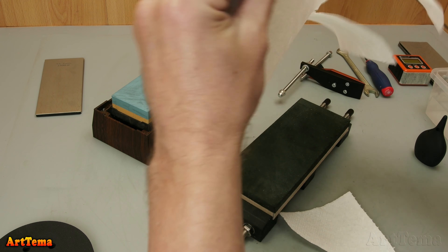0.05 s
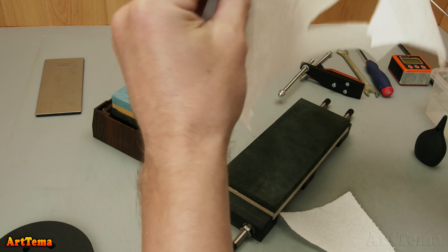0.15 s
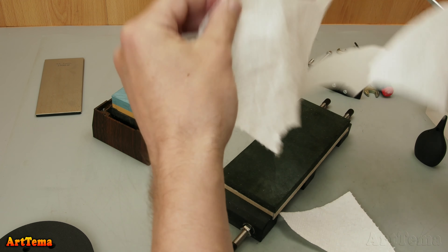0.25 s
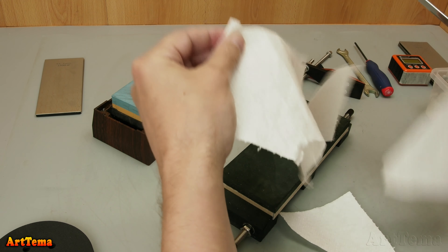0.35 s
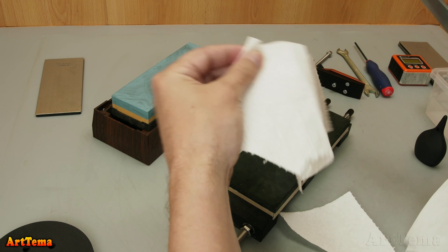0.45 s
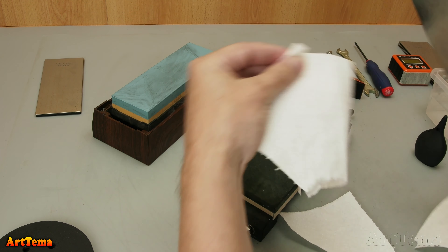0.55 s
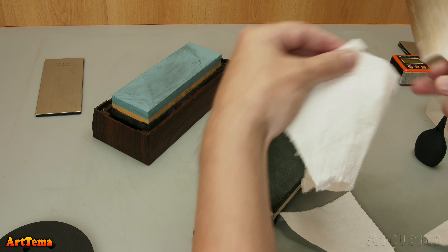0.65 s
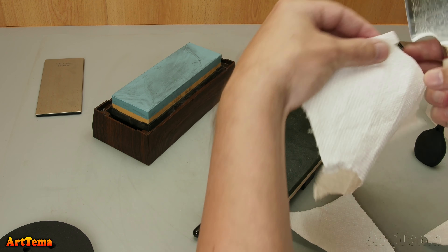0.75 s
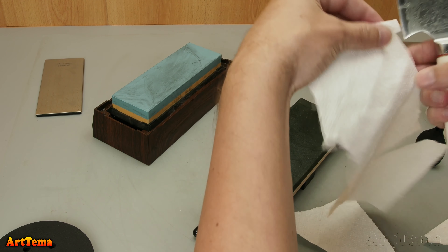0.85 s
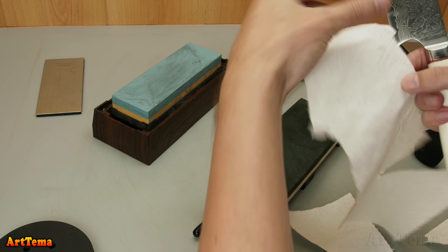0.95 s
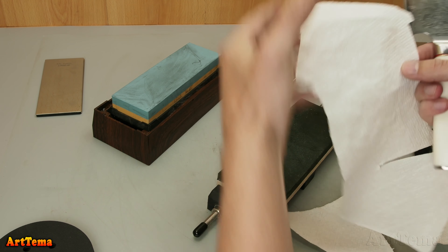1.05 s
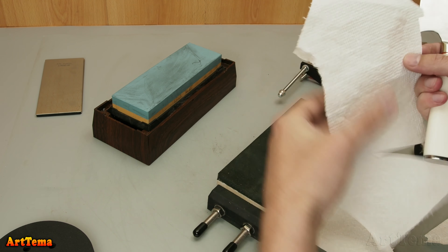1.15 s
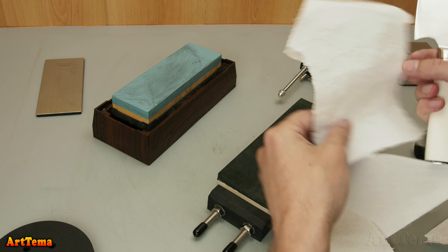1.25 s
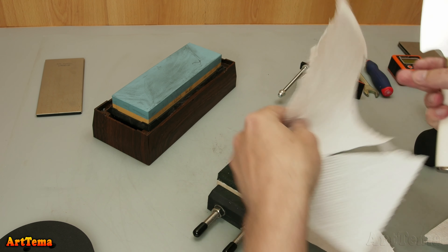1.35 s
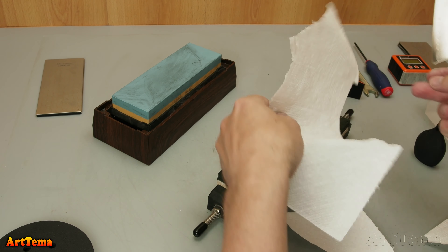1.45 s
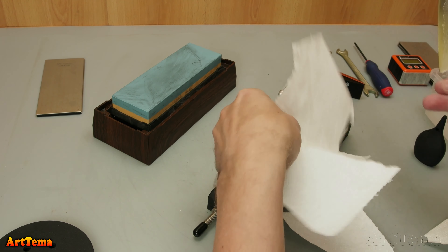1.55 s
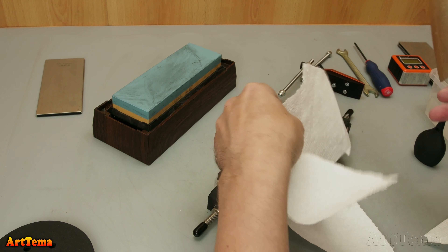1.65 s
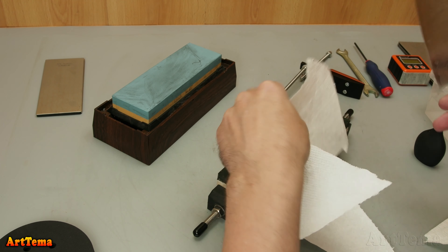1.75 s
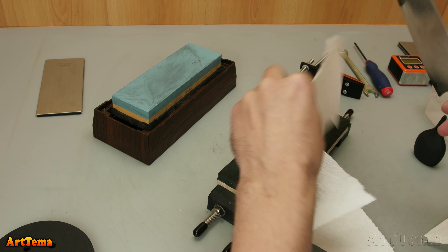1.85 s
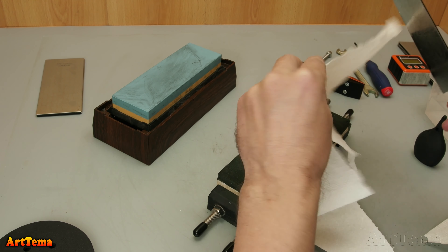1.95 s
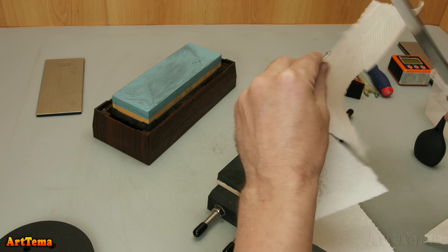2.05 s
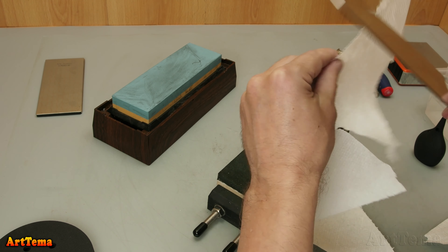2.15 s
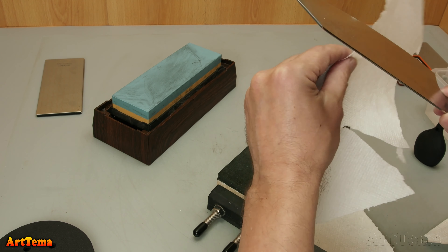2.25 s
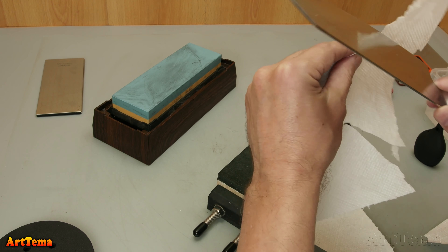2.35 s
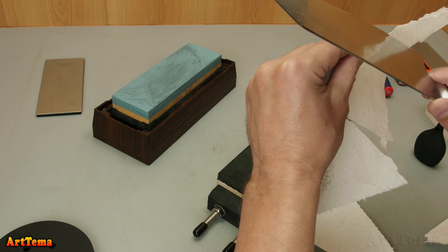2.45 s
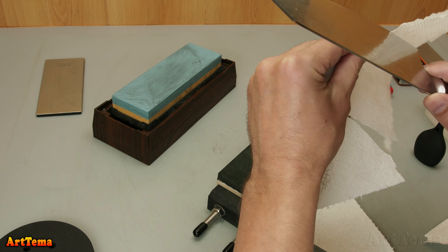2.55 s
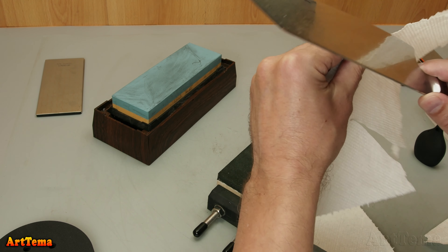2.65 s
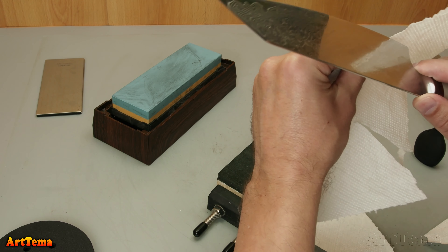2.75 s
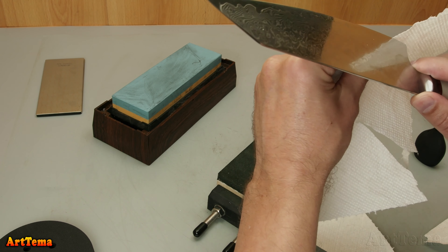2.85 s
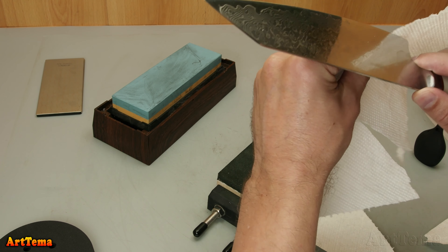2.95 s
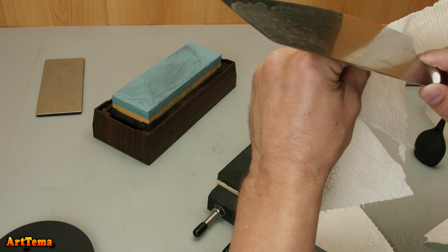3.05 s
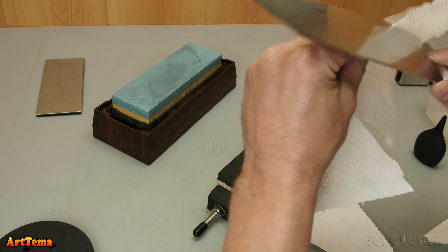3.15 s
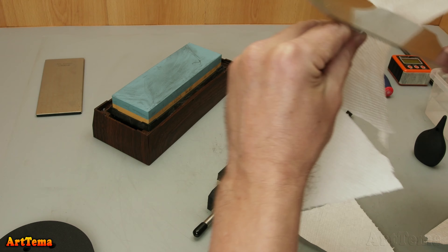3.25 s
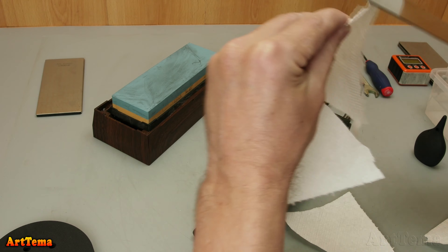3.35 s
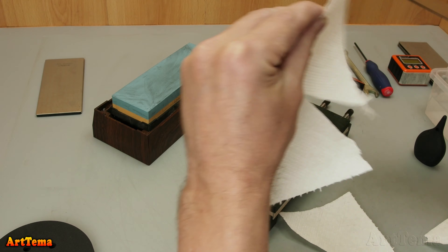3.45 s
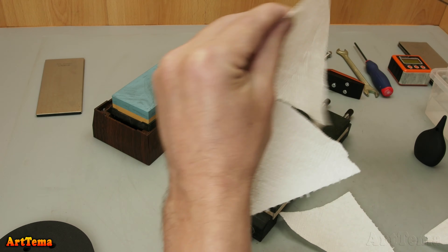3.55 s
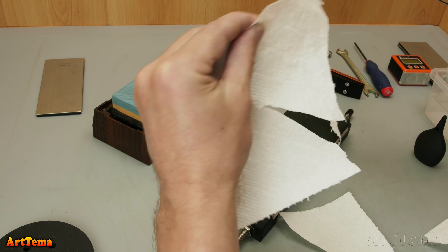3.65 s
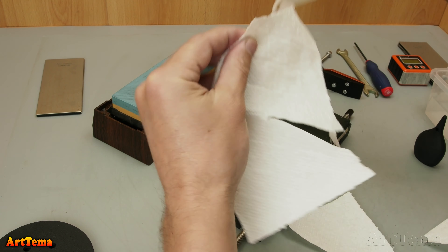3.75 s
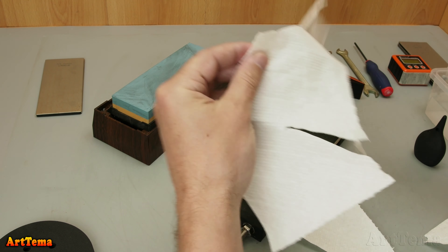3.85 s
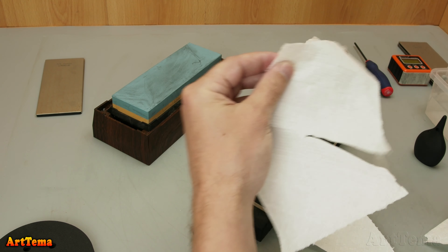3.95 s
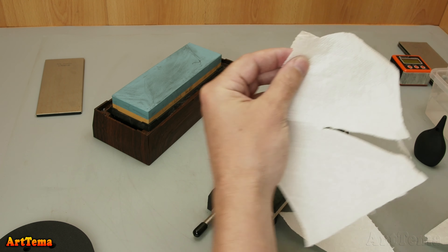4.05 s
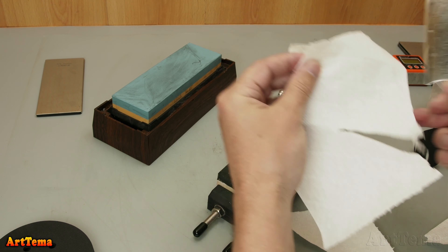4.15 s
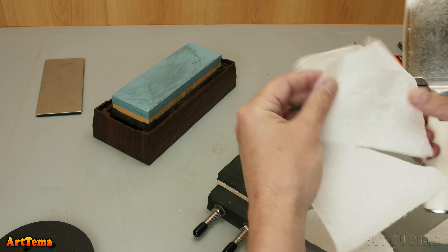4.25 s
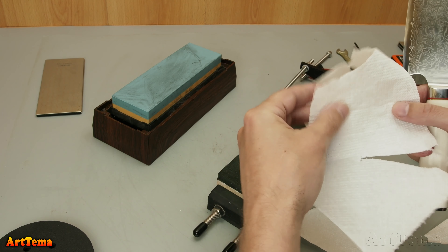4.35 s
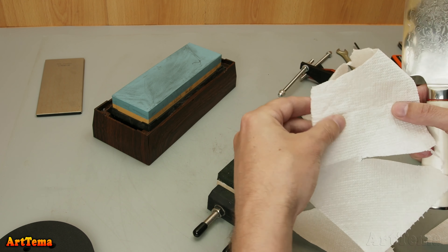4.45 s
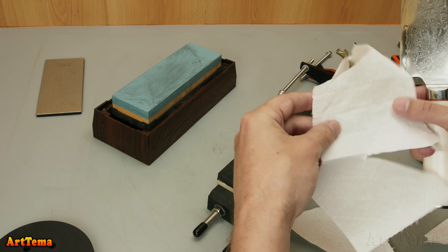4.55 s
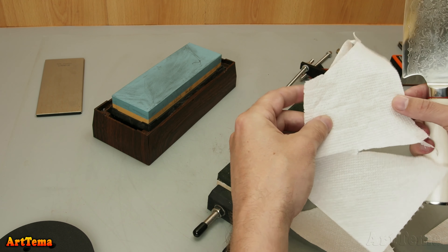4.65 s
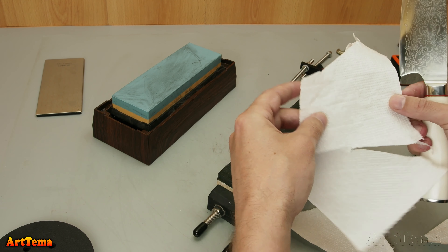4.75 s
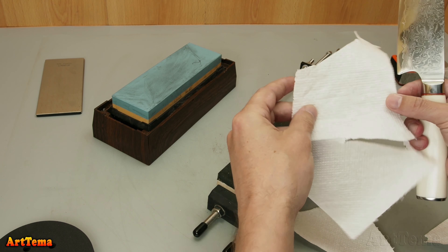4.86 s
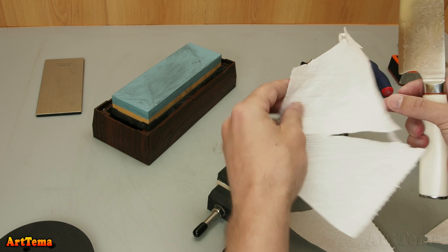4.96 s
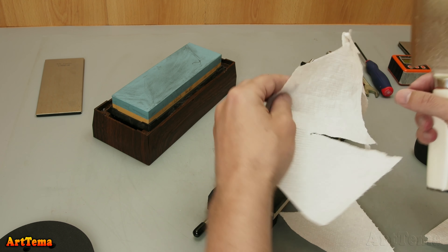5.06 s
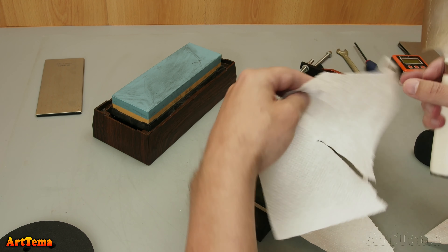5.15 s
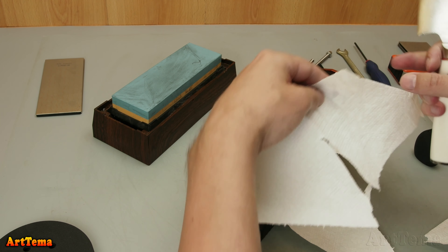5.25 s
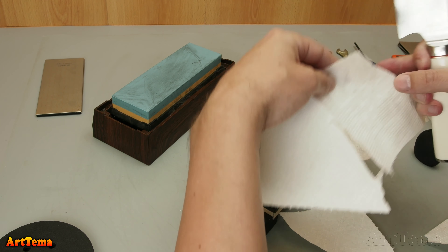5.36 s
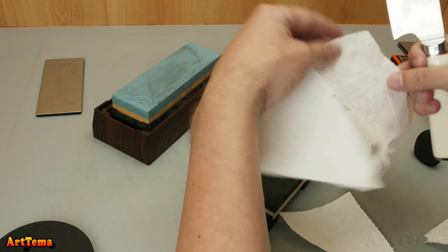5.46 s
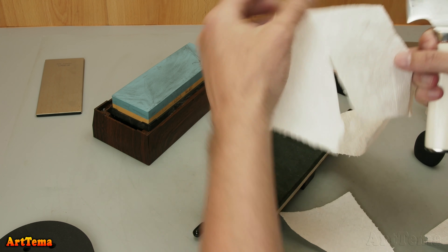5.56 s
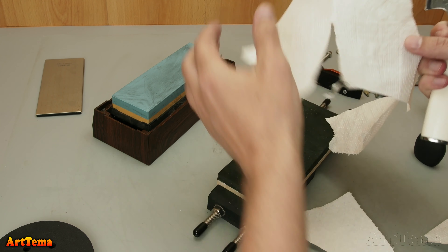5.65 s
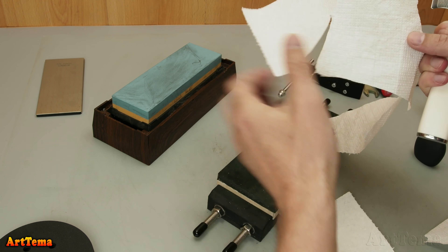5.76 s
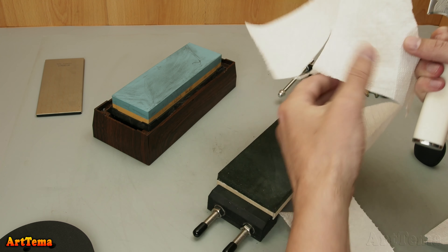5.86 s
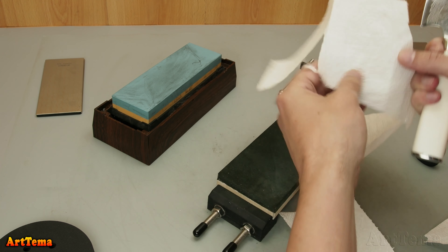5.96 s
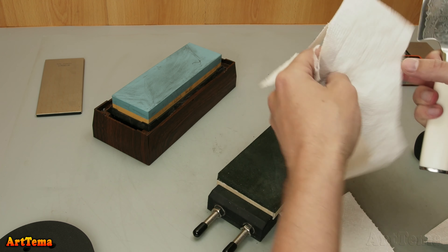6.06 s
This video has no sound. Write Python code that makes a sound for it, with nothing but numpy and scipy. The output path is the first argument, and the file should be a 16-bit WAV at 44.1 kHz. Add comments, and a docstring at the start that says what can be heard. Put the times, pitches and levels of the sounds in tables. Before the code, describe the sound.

A sharp knife slices a paper towel in two short tearing swishes, with faint paper rustling in between and afterwards.

```python
"""A kitchen knife slices twice through a hand-held paper towel above a workbench in a small room.
Fracture makes the sound: thousands of snapping fibres excite the resonances of blade and sheet, and the
taut sheet flutters. Between the cuts the fingers turn and regrip the towel, which rustles by friction
and buckling. Close by a small mechanism, likely a lens drive, ticks faintly over the room's hum."""
import sys
import numpy as np
from scipy import signal
from scipy.fft import rfft, irfft, next_fast_len
from scipy.io import wavfile
from scipy.ndimage import uniform_filter1d

SR = 44100
rng = np.random.default_rng(int(sys.argv[2]) if len(sys.argv) > 2 else 0)


def unload_audio(sound):
    """Save the sound as a 16-bit wav file, at the path given as the first command line argument."""
    columns = np.transpose(np.atleast_2d(sound))
    # keep every value between -1 and 1, then stretch to whole-number steps
    steps = np.round(np.clip(columns, -1, 1) * 32767)
    wavfile.write(sys.argv[1], SR, steps.astype(np.int16))


N = 268569
TIME = np.arange(N) / SR

# modes of blade and sheet under the cut: pitch_hz, bandwidth_hz, gain_db
CUT_MODES = [(267.4, 10, 0), (449, 33, 1), (724, 6, -25.5), (1389, 22, 10.5), (1582, 18, 6.5),
             (1646, 82, -1.5), (1960, 42.8, -28), (2195, 48, 10.5), (2487, 27, 8.5), (2915, 26, 6),
             (3450, 120, -5), (5760, 58, 17)]
# spectrum of the fluttering sheet: frequency_hz, gain_db
FLUTTER_SPECTRUM = [(30, -22), (70, -14), (130, -1.5), (200, 2), (290, -2), (350, -1), (460, -3), (600, -2),
                    (780, -7.5), (950, -10), (1200, -28.5), (2500, -42.5)]
# spectrum of tearing fibres: frequency_hz, gain_db
TEAR_SPECTRUM = [(600, -32), (1150, -18), (1400, -10), (1700, 0), (2300, -6.5), (3100, -5.5), (4400, -6.5),
                 (6000, -16.5), (10000, -25)]
# spectrum of the sliding edge: frequency_hz, gain_db
EDGE_SPECTRUM = [(2000, -51.5), (4000, -7), (5300, 6.5), (7000, 1), (9500, -5.5), (12000, -6), (15500, -13)]


def knife_cuts():
    """Forced vibration: snapping fibres ring blade and sheet and shake the towel as the edge hisses."""
    fibres = fibre_snaps(per_s=5000, spread_db=3, clump_db=0.65, clump_rate=54, scatter_s=0.0012)
    modes = sum(from_db(db) * signal.lfilter(*resonator(hz, width), fibres)
                for hz, width, db in CUT_MODES)
    ringing = fibres + modes
    tear_hz, flutter_hz = cut_pitches()
    tear_gain = cut_envelope(column=2, power=0.8, surge_share=0.75, release_s=0.0267, tail_db=-25)
    flutter_gain = cut_envelope(column=3, power=2.37, surge_share=0.01, release_s=0.0326, tail_db=-19)
    hiss_gain = cut_envelope(column=4, power=0.65, surge_share=0.12, release_s=0.0249, tail_db=-23.5)
    flutter = bending_fold(colour(ringing, FLUTTER_SPECTRUM), flutter_hz, width_hz=160, db=-2.5)
    buckling = crinkles(tear_hz, tear_gain, per_s=220, spread_octaves=0.45, t60_s=0.098)
    fracture = bending_fold(colour(ringing, TEAR_SPECTRUM), tear_hz, width_hz=1600, db=-2)
    tearing = rms_one(fracture) + from_db(-2.5) * buckling
    hiss = rms_one(colour(fibres, EDGE_SPECTRUM))
    return flutter * flutter_gain + tearing * tear_gain + hiss * hiss_gain


# strokes of the knife: start_s, end_s, tear_db, flutter_db, hiss_db, surge_db,
# flutter_pitch_hz, first_tear_pitch_hz, last_tear_pitch_hz
STROKES = [(-0.3, 0.166, -33, -33, -36.5, -5.5, 296, 1520, 3184),
           (3.055, 3.635, -38.5, -33.5, -36.5, 6.5, 430, 4330, 2295)]


def cut_envelope(column, power, surge_share, release_s, tail_db):
    """Power-law growth with the share of the sheet cut, then exponential decay; column picks the level."""
    bite_s, bite_rise_s = 0.089, 0.018  # the edge sinks in a moment after it touches
    rip_s, settle_s = 0.07, 0.12  # the last strip rips, then the freed sheet settles
    gain = 0
    for stroke in STROKES:
        start_s, end_s, surge_db = stroke[0], stroke[1], stroke[5]
        length_s = end_s - start_s
        inside_s, after_s = np.clip(TIME - start_s, 0, length_s), np.maximum(TIME - end_s, 0)
        growth = (inside_s / length_s) ** power / (1 + np.exp((bite_s - inside_s) / bite_rise_s))
        rip_db = surge_share * surge_db * np.exp((inside_s - length_s) / rip_s)
        release = np.exp(-after_s / release_s) + from_db(tail_db) * np.exp(-after_s / settle_s)
        gain = gain + from_db(stroke[column] + rip_db) * growth * release
    return gain


def cut_pitches(slack_hz=260, slacken_s=0.081):
    """Loss of tension lowers the flutter after each cut; the tearing glides as the blade advances."""
    tear_hz, flutter_hz = np.zeros((2, N))
    for start_s, end_s, *_, taut_hz, first_hz, last_hz in STROKES:
        begun = TIME >= start_s
        tear_hz[begun] = np.interp(TIME[begun], [start_s, end_s], [first_hz, last_hz])
        flutter_hz[begun] = np.interp(TIME[begun], [end_s, end_s + slacken_s], [taut_hz, slack_hz])
    return tear_hz, flutter_hz


# stereo width of the paper: frequency_hz, side_gain_db
PAPER_SPREAD = [(60, -12), (250, -13.5), (500, -14.5), (1200, -8), (2300, -10.5), (4500, -3.5), (9000, 1),
                (15000, -1)]


def fibre_snaps(per_s, spread_db, clump_db, clump_rate, scatter_s):
    """Shot noise: fibres snap at random, louder in clumps, and the sheet scatters each into a burst."""
    sizes = from_db(spread_db * np.minimum(rng.exponential(1, N), 4) + clump_db * drift(clump_rate))
    energy = sizes ** 2 * (rng.random(N) < per_s / SR)
    bursts = np.sqrt(signal.lfilter([1], [1, -np.exp(-1 / (scatter_s * SR))], energy + 1e-18))
    mid, side = bursts * rng.standard_normal((2, N))
    return rms_one(stereo(mid, side, PAPER_SPREAD))


def bending_fold(x, hz, width_hz, db, block=256):
    """Time-varying resonance: a bending fold adds a moving peak; the sum is held at even power."""
    ring, state = np.zeros((2, N)), np.zeros((2, 2))
    for i in range(0, N, block):
        span = slice(i, i + block)
        ring[:, span], state = signal.lfilter(*resonator(hz[i], width_hz), x[:, span], zi=state)
    out = x + from_db(db) * ring
    return out / np.sqrt(uniform_filter1d(np.mean(out ** 2, axis=0), size=4000))


def crinkles(fold_hz, gain, per_s, spread_octaves, t60_s):
    """Buckling: while the paper moves, small facets give way and ring near the pitch of the fold."""
    t, out = TIME[:SR // 20], np.zeros((2, N + SR // 20))
    moving = gain > 1e-6
    starts = np.flatnonzero((rng.random(N) < per_s / SR) & moving)
    draws = rng.standard_normal((N, 3))[starts]
    decay = from_db(-60 * t / t60_s)
    for i, (detune, size, angle) in zip(starts, draws):
        hz = np.clip(fold_hz[i] * 2 ** (spread_octaves * detune), 1400, 9000)
        phases = angle * hz / 5000 * np.array([[1], [-1]])  # direction sets the left-right phase
        out[:, i:i + len(t)] += from_db(2 * size) * decay * np.sin(2 * np.pi * hz * t + phases)
    return rms_one(out[:, :N]) * np.sqrt(np.mean(moving))


# the sheet snags on the edge or is flicked:
# peak_s, crackle_db, flap_db, crease_pitch_hz, flap_pitch_hz, fade_s
SNAGS = [(0.002, -37, -33, 2610, 186, 0.015), (0.0474, -31, -56, 2340, 210, .02),
         (0.151, -35, -29.5, 3060, 414, 0.0059), (0.169, -23, -45, 3900, 223, 0.0019),
         (0.259, -49.5, -60, 2150, 283, 0.017), (0.539, -61.5, -53.5, 1640, 282, 0.014),
         (0.6147, -39.5, -44, 1520, 157, 0.0064), (0.82, -58, -64, 3160, 172, 0.009),
         (1.057, -69, -51.5, 2230, 453, 0.02), (1.3648, -51, -51, 1780, 196, 0.0076),
         (1.3957, -59, -43, 2240, 180, 0.016), (3.323, -35.5, -38, 2600, 394, 0.012),
         (3.375, -35, -58, 1930, 377, .013), (3.464, -49.5, -32.5, 4000, 418, 0.019),
         (3.5765, -26, -36, 2860, 283, 0.011), (3.6238, -24, -23.5, 2000, 425, 0.0084),
         (3.684, -36.5, -35.5, 3000, 275, 0.0067), (4.4163, -58.5, -54.5, 2180, 485, 0.0078),
         (4.712, -51, -48.5, 1560, 400, 0.01), (5.691, -52, -70, 2400, 164, 0.0096)]
# spectrum of skin brushing paper, also the top of a crackle: frequency_hz, gain_db
BRUSH_SPECTRUM = [(2000, -9.5), (4000, -2), (5500, 2.5), (7500, -3.5), (10000, -6.5), (12500, -9),
                  (15500, -13)]


def sheet_jerks(swell_s=0.0034, crease_width_hz=450, crease_db=6, flap_width_hz=170, flap_stretch=1.25):
    """Transient excitation: a crease lets go with a quick crackle and a low, slower flap of the sheet."""
    grains = fibre_snaps(per_s=5100, spread_db=4, clump_db=3.5, clump_rate=170, scatter_s=0.00099)
    crisp = rms_one(colour(grains, TEAR_SPECTRUM))
    crisp += from_db(-7.5) * rms_one(colour(grains, BRUSH_SPECTRUM))
    out = np.zeros((2, N))
    for peak_s, crackle_db, flap_db, crease_hz, flap_hz, fade_s in SNAGS:
        near = np.abs(TIME - peak_s) < 0.1
        t = TIME[near] - peak_s
        quick = np.exp(-np.maximum(-t / swell_s, t / fade_s))
        slow = quick ** (1 / flap_stretch)
        crease, sheet = resonator(crease_hz, crease_width_hz), resonator(flap_hz, flap_width_hz)
        crackle = crisp[:, near] + from_db(crease_db) * signal.lfilter(*crease, crisp[:, near])
        flap = signal.lfilter(*sheet, signal.lfilter(*sheet, grains[:, near]))
        for sound, envelope, db in ((crackle, quick, crackle_db), (flap, slow, flap_db)):
            out[:, near] += from_db(db) * rms_one(envelope * sound) * np.sqrt(np.mean(envelope ** 2))
    return out


# spectrum of rustling paper: frequency_hz, gain_db
RUSTLE_SPECTRUM = [(60, -43), (200, 5), (450, 2), (750, -2.5), (1100, -13.5), (1600, -4.5), (2300, -2.5),
                   (3400, -3), (5200, -2), (7000, -15.5), (11000, -28.5)]


def handling():
    """Friction noise: soft paper slides over skin and crinkles; the bending fold favours one pitch."""
    grains = fibre_snaps(per_s=4000, spread_db=2.5, clump_db=1.3, clump_rate=60, scatter_s=0.0012)
    rustle_gain, brush_gain, fold_hz = rub_envelopes()
    sliding = bending_fold(colour(grains, RUSTLE_SPECTRUM), fold_hz, width_hz=1000, db=0)
    buckling = crinkles(fold_hz, rustle_gain, per_s=300, spread_octaves=0.251, t60_s=0.053)
    rustle = rms_one(sliding + from_db(-4) * buckling)
    brushing = rms_one(colour(grains, BRUSH_SPECTRUM))
    return rustle * rustle_gain + brushing * brush_gain


# fingers or the flat of the blade slide on the towel: middle_s, length_s, rustle_db, brush_db, pitch_hz
SLIDES = [(0.123, 0.035, -39.5, -33, 4040), (0.272, 0.041, -60, -57, 2300),
          (0.365, 0.078, -64.5, -69, 3030), (0.616, 0.025, -49, -65, 1733), (0.645, 0.024, -60, -72, 2720),
          (0.843, 0.06, -63, -72, 3130), (1.06, 0.036, -57.5, -54.5, 2740), (1.159, 0.019, -60, -70, 2280),
          (1.24, 0.05, -63.5, -68, 3470), (1.35, 0.021, -65, -63, 1900), (1.414, 0.036, -51.5, -53.5, 2786),
          (1.485, 0.14, -67, -65, 2960), (1.627, 0.064, -65, -81, 3340), (1.73, 0.056, -62, -63, 2410),
          (1.815, 0.056, -65.5, -68.5, 2450), (1.893, 0.051, -66.5, -61.5, 4040),
          (1.998, 0.058, -61.5, -69, 2760), (2.104, 0.17, -69, -69, 3030), (3.1, 0.033, -68, -70, 3860),
          (3.22, .05, -47.5, -44.5, 4360), (3.316, 0.022, -41.5, -37.5, 3490),
          (3.548, 0.03, -38, -43, 3320), (4.495, 0.081, -53.5, -59.5, 2600),
          (4.734, 0.044, -54.5, -59.5, 3010), (4.796, 0.06, -59.5, -61.5, 2690),
          (5.014, .048, -62.5, -67.5, 2450), (5.206, 0.12, -63, -67.5, 3490),
          (5.35, 0.054, -68.5, -69, 3560), (5.622, 0.059, -55.5, -62, 2440), (5.693, 0.038, -56, -70, 2280),
          (6.018, 0.029, -69.5, -62.5, 2900), (6.085, 0.047, -67, -63, 2680)]


def rub_envelopes(steepness=4.46, fade_stretch=1.15):
    """Incoherent addition: overlapping rubs sum in power, and the loudest dominates the fold's pitch."""
    middle_s, length_s, rustle_db, brush_db, pitch_hz = np.transpose(SLIDES)
    offset = 2 * (TIME[:, None] - middle_s) / length_s
    swells = 1 / (1 + np.maximum(-offset, offset / fade_stretch) ** steepness)
    rustle_power, brush_power = from_db(rustle_db) ** 2, from_db(brush_db) ** 2
    fold_hz = swells @ (rustle_power * pitch_hz) / (swells @ rustle_power)
    return np.sqrt(swells @ rustle_power), np.sqrt(swells @ brush_power), fold_hz


# reflections from the bench, then the room: level_db, t60_s
ECHOES = [(-11.5, 0.098), (-17, 0.18)]


def room(direct):
    """Reverberation: a quick scatter from the bench and the room's short tail follow the direct sound."""
    t, out = TIME[:SR // 2], direct
    mono = direct.mean(axis=0)[None]
    for level_db, t60_s in ECHOES:
        decay = from_db(-60 * t / t60_s) * (t > 0.002)
        mid, side = rng.standard_normal((2, len(t))) * decay / np.linalg.norm(decay)
        response = stereo(mid, side, PAPER_SPREAD)
        out = out + from_db(level_db) * signal.fftconvolve(mono, response, axes=1)[:, :N]
    return out


# the clearest ticks of the lens drive: start_s, level_db
CLEAR_TICKS = [(0.518, -55), (1.32, -58), (2.087, -51), (2.221, -56), (2.288, -56), (2.355, -56),
               (2.488, -57), (2.621, -57), (2.687, -58), (2.755, -57), (2.987, -53), (4.023, -55),
               (4.09, -59), (4.223, -56), (4.289, -56), (4.923, -56), (5.057, -55), (5.991, -59)]
# modes of the drive: pitch_hz, gain_db, t60_s
DRIVE_MODES = [(470, -8, .025), (660, -3, .025), (780, -2, .028), (920, -1, .028), (1350, -8, .02)]


def lens_ticks(first_s=0.0185, step_s=1 / 29.97):
    """Impulse response: regular steps of uneven strength strike the damped modes of the drive."""
    times = np.arange(first_s, TIME[-1], step_s)
    sizes_db = rng.normal(-64.5, 2, len(times))
    for start_s, level_db in CLEAR_TICKS:
        sizes_db[np.abs(times - start_s).argmin()] = level_db
    clicks, ring = np.zeros(N), np.zeros(N)
    for hz, db, t60_s in DRIVE_MODES:
        clicks[(times * SR).astype(int)] = from_db(sizes_db + db + rng.normal(0, 1.5, len(times)))
        radius, angle = from_db(-60 / (t60_s * SR)), 2 * np.pi * hz / SR
        mode = signal.lfilter([0, np.sin(angle)], [1, -2 * radius * np.cos(angle), radius ** 2], clicks)
        ring = mode - ring  # neighbouring modes alternate in sign
    return ring / np.linalg.norm([from_db(db) for _, db, _ in DRIVE_MODES])


# spectrum of room hum and microphone hiss: frequency_hz, gain_db
HUM_SPECTRUM = [(15, -53.5), (25, -16), (59, -6), (99, -3.5), (129, -1), (227, -3.5), (389, -7.5),
                (648, -13.5), (848, -22.5), (1140, -39.5), (1240, -28.5), (1800, -25.5), (2770, -27),
                (3340, -26.5), (15500, -40.5)]
# stereo width of that background: frequency_hz, side_gain_db
HUM_SPREAD = [(40, 0.5), (130, -5.5), (300, -3.5), (700, -3), (1400, 0), (4000, -0.5), (15000, 0)]


def room_hum(level_db=-62):
    """Stationary noise: the low hum of the room lies under a thin hiss."""
    mid, side = (rms_one(colour(white, HUM_SPECTRUM)) for white in rng.standard_normal((2, N)))
    return from_db(level_db) * stereo(mid, side, HUM_SPREAD)


def from_db(db):
    """Decibels to amplitude ratio."""
    return 10 ** (np.asarray(db) / 20)


def rms_one(x):
    """Normalisation to unit power."""
    return x / np.sqrt(np.mean(x ** 2) + 1e-20)


def drift(rate, hop=40):
    """Low-pass noise: a slow random wander of unit spread."""
    pole = np.exp(-2 * hop * np.pi * rate / SR)
    white = rng.standard_normal(N // hop + 2002)
    slow = signal.lfilter([1], [1, -2 * pole, pole * pole], white)[2000:]
    return np.interp(np.arange(N) / hop, np.arange(len(slow)), rms_one(slow))


def colour(x, spectrum):
    """Minimum-phase filtering: a causal response follows a table of frequency_hz, gain_db."""
    size = 2 * next_fast_len(x.shape[-1] // 2 + 4096)
    hz, db = np.transpose(spectrum)
    grid_hz = np.maximum(np.arange(size // 2 + 1) * SR / size, 1)
    gain = from_db(np.interp(np.log(grid_hz), np.log(hz), db))
    cepstrum = irfft(np.log(gain))
    cepstrum[1:size // 2] *= 2
    cepstrum[size // 2 + 1:] = 0
    return irfft(rfft(x, size) * np.exp(rfft(cepstrum)))[..., :x.shape[-1]]


def resonator(hz, width_hz):
    """Damped oscillator: filter coefficients with unit gain at the peak."""
    r = np.exp(-np.pi * width_hz / SR)
    return (1 - r * r) / 2 * np.array([1, 0, -1]), [1, -2 * r * np.cos(2 * np.pi * hz / SR), r * r]


def stereo(mid, side, width):
    """Partial coherence: left and right are alike at frequencies where the side signal is weak."""
    side = colour(side, width)
    return np.array([mid + side, mid - side])


def scene(pan_db=1.2):
    """Superposition: the towel, a little to the right, sounds over the ticks and the hum."""
    left, right = room(knife_cuts() + handling() + sheet_jerks())
    late_left = np.append(0, left[:-1])  # the longer path takes one more sample
    paper = np.array([late_left * from_db(-pan_db), right * from_db(pan_db)])
    return paper + lens_ticks() + room_hum() * from_db([[-0.4], [0.4]])


def record(dry, cutoff_hz=15750):
    """Band limiting: a steep low-pass removes the highest treble."""
    return signal.sosfilt(signal.ellip(12, 0.1, 80, cutoff_hz, fs=SR, output="sos"), dry)


dry = scene()
out = record(dry)
unload_audio(out)
```